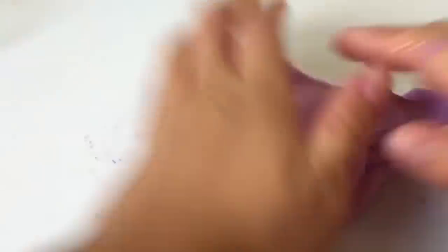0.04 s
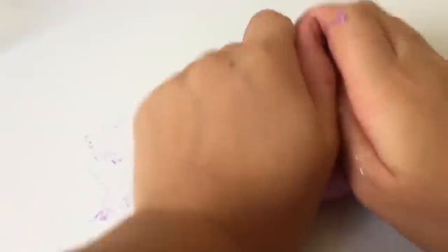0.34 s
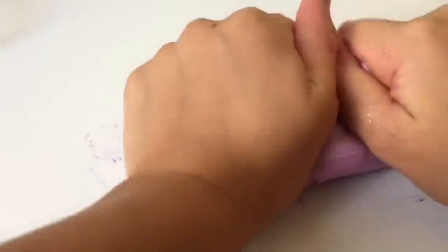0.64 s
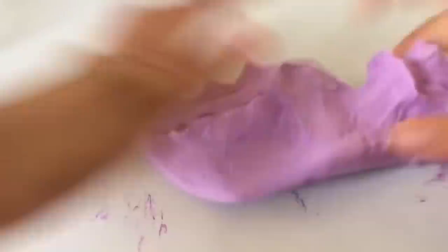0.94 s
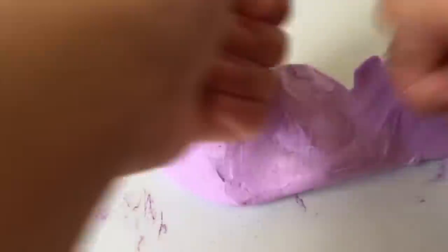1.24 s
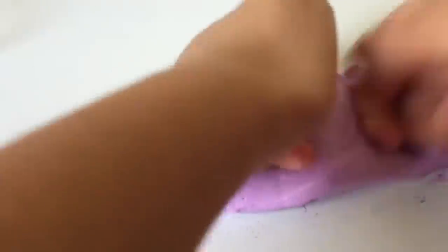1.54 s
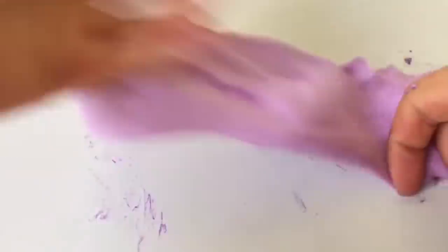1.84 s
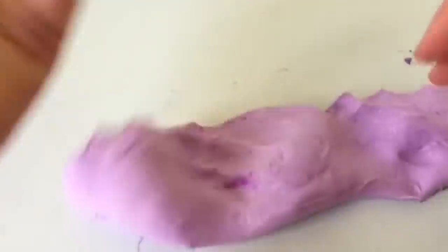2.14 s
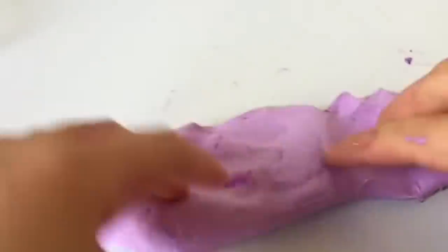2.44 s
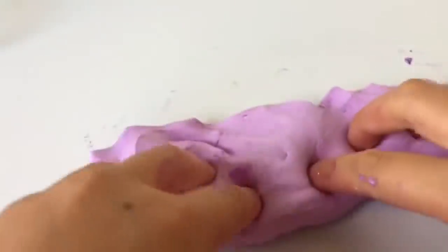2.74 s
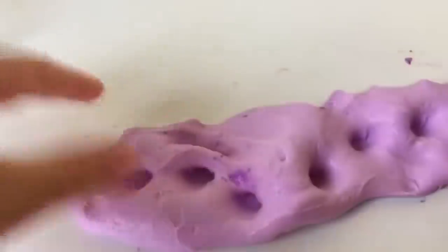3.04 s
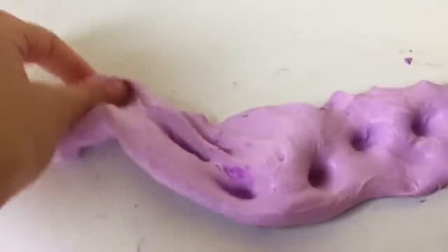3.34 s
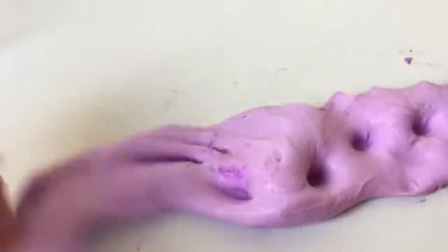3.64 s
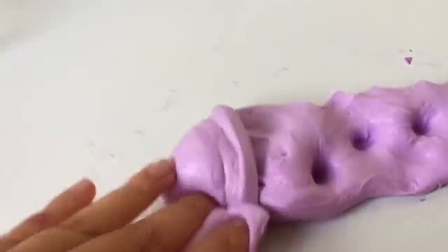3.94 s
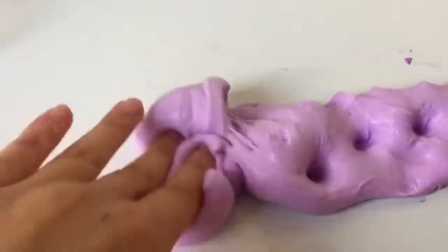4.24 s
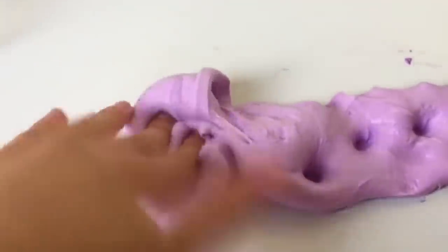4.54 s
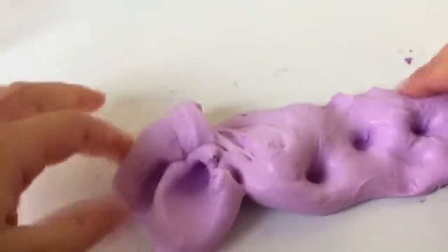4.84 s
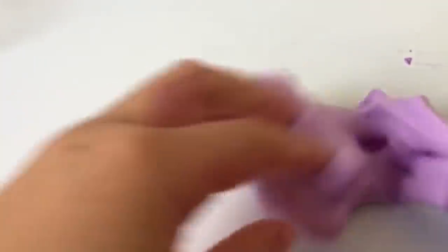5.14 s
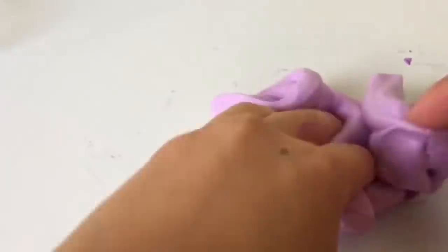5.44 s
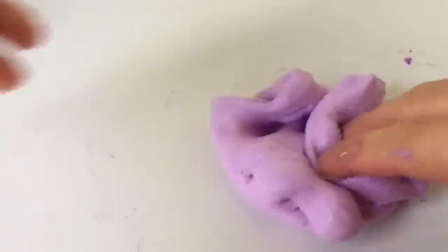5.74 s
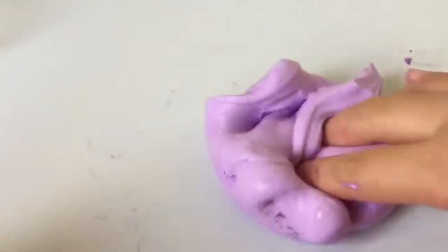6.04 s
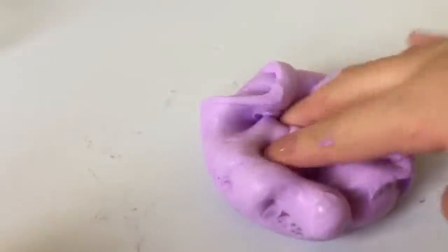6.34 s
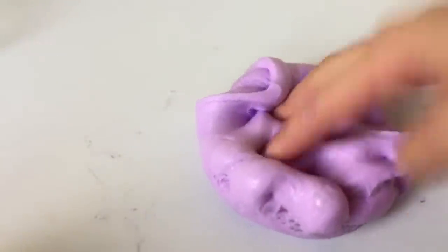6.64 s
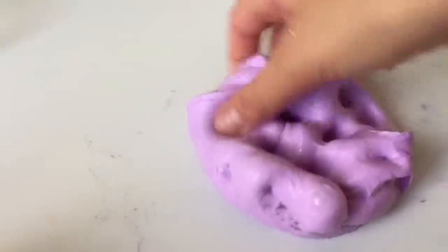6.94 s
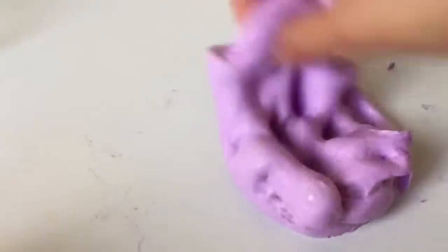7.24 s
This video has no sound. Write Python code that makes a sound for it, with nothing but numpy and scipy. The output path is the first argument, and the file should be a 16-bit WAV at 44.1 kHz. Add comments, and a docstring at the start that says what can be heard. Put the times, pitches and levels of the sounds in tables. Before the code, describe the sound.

Hands knead sticky slime on a table, heard close in a small room with slight reverberation and a quiet rumble and hiss. A soft thud and a wet crackle open the sound, followed by light crackling and a few sharp clicks. At about 1 second a dull bump comes with a squelch and a cluster of pops. More thuds, squelches and small pops follow between 1.7 and 2.4 seconds. Just after 3 seconds several air pockets burst in quick succession over a knock from the tabletop. Only faint sticky crackles and the odd tick are heard from 3.5 to 4.6 seconds. Pops and soft bumps return around 4.7 to 5 seconds and again at 5.8. The loudest, rounder pops come in two clusters at 6.3 and 6.8 seconds, each with a thud. A smaller bump and a faint squelch follow by 7.3 seconds.

```python
"""A soft thud and a wet crackle come first: hands knead sticky slime on a table in a small room.
Each push excites the damped modes of the tabletop. Skin peeling off the slime breaks countless tiny
threads and opens small bubbles, heard as crackle and squelch. Trapped air pockets burst with the snap
of their film and a short cavity resonance. The walls add a brief reverberation to the slime's sounds,
and a quiet rumble and hiss lie underneath."""
import sys
import numpy as np
from scipy import signal
from scipy.fft import rfft, irfft, next_fast_len
from scipy.io import wavfile

SR = 44100
rng = np.random.default_rng(int(sys.argv[2]) if len(sys.argv) > 2 else 0)


def to_wav(s):
    """Save 16-bit WAV."""
    ch = np.atleast_2d(s).T  # columns
    pcm = np.round(np.clip(ch, -1, 1) * 32767)  # PCM
    wavfile.write(sys.argv[1], SR, pcm.astype(np.int16))


N = 325458
TIME = np.arange(N) / SR

# Spectral shape of the room's background noise: frequency_hz, gain_db
BACKGROUND_SPECTRUM = [(25, -16.5), (45, -5.5), (65, 0), (110, -6.5), (155, -4.5), (205, 1.5), (245, -10.5),
                       (310, -10.5), (480, -17.5), (1000, -22), (2200, -23.5), (5000, -28.5),
                       (10000, -32.5), (14000, -34.5)]
# Spectral shape of the wall reflections: frequency_hz, gain_db
REVERB_SPECTRUM = [(100, 1.5), (400, 4.5), (1000, -2.5), (3000, -5), (6000, -6.5), (10000, -6), (14000, -7)]
# Normal modes of the tabletop: pitch_hz, relative_level_db, t60_s
TABLETOP_MODES = [(62, -2, .34), (69, -0.5, .3), (87, -1, .26), (104, -2, 0.37), (122, -1.5, .24),
                  (168.4, -1.5, .26), (210, -1.5, 0.21), (254, 1, .22), (297, -1.5, 0.41), (355, -1.5, .18),
                  (420, -2.5, .15)]
# Pushes on the table (low modes boom, higher modes knock): start_s, boom_db, knock_over_boom_db
PUSHES = [(.005, -41.5, -6), (0.239, -45.5, -14), (.39, -54, -2), (.49, -47.5, -6), (.58, -46.5, -4),
          (.835, -42, -9.5), (1.039, -33.5, -3.5), (1.478, -56, -17), (1.735, -33.5, -14.5),
          (1.935, -37.5, -7.5), (2.262, -37, -12), (2.351, -43, -9), (2.597, -54.5, -8), (3.055, -33, -1.5),
          (3.14, -39, -7.5), (3.28, -39.5, -3.5), (4.156, -60, -8), (4.735, -36.5, -10), (4.87, -45, -17),
          (4.968, -36.5, -5), (5.275, -50.5, -6), (5.775, -41, 7.5), (5.84, -46.5, -4), (6.172, -52.5, 4.5),
          (6.302, -36, -2.5), (6.828, -31.5, -3.5), (7.026, -34.5, 1), (7.265, -48.5, -8.5)]
# Spectral shape of the breaking threads: frequency_hz, gain_db
CRACKLE_SPECTRUM = [(200, -6), (330, -3), (500, -3.5), (1000, -5), (2400, 1.5), (4300, -0.5), (6000, -3),
                    (9000, -4), (11000, -6), (13500, -2.5)]
# Pulls on the slime: full_pull_s, rise_s (last 20 dB), hold_s, relative_level_db, wetness_db
# Greater wetness favours the bubbles over the crackle.
PULLS = [(.009, .026, .011, -35, -4), (.045, .021, 0, -41, -2), (.335, .045, .1, -56, -4),
         (.49, .08, .13, -53, -3.5), (.71, .05, .08, -63, -3), (.852, .075, .02, -45, -10),
         (1.036, .056, .018, -37, 4.5), (1.086, .04, .052, -44, 2), (1.164, .018, 0, -50, 1),
         (1.701, .016, 0, -45, -4), (1.746, .021, .014, -39, .5), (1.81, .06, .07, -60, -1),
         (1.964, .03, 0, -33.5, 4), (2.0, .03, .02, -53, -1), (2.105, .045, .025, -47.5, -3),
         (2.248, .015, 0, -50, 7), (3.09, .028, 0, -39, 2), (3.327, .038, 0, -47, -1.5),
         (3.452, .065, 0, -50.5, -4), (3.642, .012, .033, -59, 2), (3.781, .018, 0, -51.5, 2.5),
         (3.81, .06, .15, -64.5, 3), (4.053, .014, 0, -50, -5), (4.747, .024, .033, -41.5, 0),
         (4.996, .035, .01, -52, 3.5), (5.06, .045, .135, -57, 1), (5.284, .018, .054, -53, 0),
         (5.776, .022, .022, -39.5, 5), (6.334, .022, 0, -38, 3), (7.135, .032, 0, -53, -3),
         (7.236, .02, .034, -51.5, 3.5)]
# Bursting air pockets: start_s, cavity_pitch_hz, relative_level_db, tautness_db
# Greater tautness favours the film's snap over the cavity's ring.
AIR_POCKETS = [(.308, 980, -46, 5), (0.4628, 1530, -50.5, 10), (.5749, 1690, -36, -8.5),
               (0.5895, 970, -31, 5.5), (.6409, 1680, -46.5, -2), (0.7847, 1530, -32.5, 7),
               (.8384, 1370, -28, 12.5), (1.0333, 2310, -28.5, -5), (1.0475, 1570, -24, -9.5),
               (1.053, 800, -30, -19), (1.2304, 916, -71, 12), (1.536, 997, -60.5, -2.5),
               (1.731, 1300, -40, 1), (1.932, 1320, -49, 1), (2.052, 1400, -43, -9.5),
               (2.261, 1402, -35.5, -7.5), (2.3491, 1550, -40, -7), (2.361, 913, -32.5, -17.5),
               (2.836, 1100, -76.5, 12), (3.0463, 1060, -39.5, 3), (3.0554, 780, -27, -1),
               (3.0746, 1344, -24, -3.5), (3.0862, 1200, -28, -8), (3.0972, 1300, -24, -1.5),
               (3.2799, 615, -39, -3.5), (3.355, 1570, -43, 0.5), (4.35, 1506, -47, -1),
               (4.736, 1295, -28.5, 1), (4.8751, 1260, -45, -8), (4.968, 1250, -39.5, -2.5),
               (5.4937, 1172, -78.5, 13.5), (5.7461, 1293, -30, -5.5), (5.7745, 601, -29.5, -10.5),
               (5.791, 731, -31.5, -4), (5.9995, 599.4, -77.5, 10.5), (6.1706, 964.4, -49.5, -1.5),
               (6.3031, 792, -14.5, -5.5), (6.3234, 1020, -20.5, 3.5), (6.3421, 1260, -26, -3.5),
               (6.8282, 787, -15, -1), (6.8416, 950, -21.5, -6), (6.875, 1383, -18.5, -1),
               (7.0282, 658, -35.5, -4.5), (7.076, 542, -42, -11.5)]


def undb(db):
    """Amplitude grows tenfold for every 20 dB."""
    return 10 ** (np.asarray(db) / 20)


def add(track, start_s, sound):
    """Superposition: a sound adds to the track from start_s on."""
    start = int(round(start_s * SR))
    lo, hi = max(start, 0), min(start + len(sound), N)
    track[lo:hi] += sound[lo - start:hi - start]


def at_level(x, db, span_s):
    """Equal energy: x is scaled to match a level of db held for span_s."""
    return x * undb(db) * np.sqrt(span_s * SR / (np.sum(x ** 2) + 1e-18))


def band(x, lo_hz, hi_hz, order=2):
    """A causal band-pass attenuates frequencies outside its edges."""
    sos = signal.butter(order, [lo_hz, min(hi_hz, .45 * SR)], "band", fs=SR, output="sos")
    return signal.sosfilt(sos, x)


def colour(x, spectrum):
    """Spectral weighting: gains are interpolated over log frequency."""
    hz, db = np.transpose(spectrum)
    size = next_fast_len(len(x))
    bin_hz = np.maximum(np.arange(size // 2 + 1) * SR / size, 1)
    gain = undb(np.interp(np.log(bin_hz), np.log(hz), db))
    return irfft(rfft(x, size) * gain, size)[:len(x)]


def decay(t, t60_s):
    """Exponential damping: the level falls 60 dB in t60_s."""
    return np.exp(-np.log(1000) * t / t60_s)


def wander(per_s):
    """Random modulation: straight lines join random values, with a spread near 1."""
    return np.interp(TIME * per_s, np.arange(4096), rng.standard_normal(4096)) * np.sqrt(1.5)


def ruptures(per_s, spread_db=3):
    """Shot noise: independent impulses of either sign, many small and a few large."""
    chance, strength, sign = rng.random(N), rng.exponential(size=N), rng.choice([-1, 1], N)
    return (chance < per_s / SR) * sign * undb(spread_db * np.minimum(strength, 4))


def background(level_db=-63):
    """Stationary noise, weighted toward the bass, gives the room's rumble and hiss."""
    return at_level(colour(rng.standard_normal(N), BACKGROUND_SPECTRUM), level_db, N / SR)


def reverberate(x, wet_db=-18, low_t60_s=.31, high_t60_s=.24, build_s=.009):
    """Reverberation: wall reflections build into a diffuse tail whose treble dies first."""
    t = TIME[:SR * 3 // 5]
    lows = band(rng.standard_normal(len(t)), 90, 4200) * decay(t, low_t60_s)
    highs = band(rng.standard_normal(len(t)), 4200, 16000) * decay(t, high_t60_s)
    tail = colour(lows + highs, REVERB_SPECTRUM) * (1 - np.exp(-(t / build_s) ** 2))
    tail /= np.sqrt(np.sum(tail ** 2))
    return x + undb(wet_db) * signal.fftconvolve(x, tail)[:N]


def faint_ticks(level_db=-81):
    """Sparse shot noise: each impulse sets off a faint high tick."""
    t = TIME[:SR // 25]
    envelope = decay(t, .045) * (1 - decay(t, .012))
    tick = band(rng.standard_normal(len(t)) * envelope, 10800, 14000)
    return at_level(signal.fftconvolve(ruptures(per_s=20), tick)[:N], level_db, N / SR)


def table_thuds(boom_rise_s=.009, knock_rise_s=.0014, settle_s=.058, settle_db=-9):
    """Modal vibration: a push rings the table, and the place of contact sets each mode's share."""
    out, t = np.zeros(N), TIME[:SR // 2]
    hz, mode_db, t60_s = np.transpose(TABLETOP_MODES)[:, :, None]
    low = hz[:, 0] < 150
    boom_onset = 1 - np.exp(-(t / boom_rise_s) ** 2)
    knock_onset = 1 - np.exp(-(t / knock_rise_s) ** 2)
    for push_s, boom_db, knock_over_boom_db in PUSHES:
        # after each push the lump sinks back with a softer bump
        for start_s, db in (push_s, boom_db), (push_s + settle_s, boom_db + settle_db):
            detune, share, phase = rng.standard_normal((3, len(hz), 1))
            tones = np.sin(2 * np.pi * (hz * (1 + .035 * detune) * t + phase))
            modes = undb(mode_db + 3 * share) * tones * decay(t, t60_s)
            add(out, start_s, at_level(modes[low].sum(0) * boom_onset, db, .032))
            add(out, start_s, at_level(modes[~low].sum(0) * knock_onset, db + knock_over_boom_db, .018))
    return out


def snapping_threads(flicker_db=4, flicker_per_s=45):
    """Band-limited shot noise: threads of each thickness snap in their own band, in shifting shares."""
    out = np.zeros(N)
    for hz in np.geomspace(350, 13500, num=16):
        width_hz = hz / 4
        breaks = ruptures(per_s=200 + width_hz)  # wider bands hold more breaks
        clicks = band(breaks, hz - width_hz / 2, hz + width_hz / 2, order=1)
        flicker = undb(flicker_db * wander(flicker_per_s))
        out += np.sqrt(width_hz) * clicks / np.std(clicks) * flicker
    return at_level(colour(out, CRACKLE_SPECTRUM), 0, N / SR)


def bubbles(size, centre_hz, per_s, spread_octaves, ring_cycles=21, spread_db=2.5):
    """Cavity resonance: tiny bubbles open and ring briefly at pitches scattered around centre_hz."""
    out, t = np.zeros(size + SR // 50), TIME[:SR // 50]
    for place, pitch, strength in rng.random((int(per_s * size / SR) + 1, 3)):
        deviation = np.clip(np.log(pitch / (1 - pitch)) / 2, -2, 2)  # bell-shaped scatter
        hz = centre_hz * 2 ** (spread_octaves * deviation)
        gain = undb(spread_db * min(-np.log(strength), 3)) * np.sqrt(hz / centre_hz)
        opening = 1 - np.exp(-2 * hz * t)
        ring = np.sin(2 * np.pi * hz * t) * decay(t, ring_cycles / hz) * opening
        start = int(place * size)
        out[start:start + len(t)] += gain * ring
    return out[:size]


def peeling(first_bubble_hz=1682, sink_octaves_per_s=.115, sag_db_per_s=14.5, jerk_db=2.5):
    """Adhesion fails in jerks: each pull breaks sticky threads while small bubbles open."""
    out, crackle = np.zeros(N), snapping_threads()
    jerks = undb(jerk_db * wander(per_s=110))
    for full_s, rise_s, hold_s, db, wetness_db in PULLS:
        # a pull tires while it is held and lets go more slowly than it grips
        fall_s = 1.3 * rise_s
        span = slice(max(int((full_s - 2 * rise_s) * SR), 0), int((full_s + hold_s + 2 * fall_s) * SR))
        t = TIME[span] - full_s
        slack = np.maximum(np.maximum(-t / rise_s, (t - hold_s) / fall_s), 0)
        pull = undb(-20 * slack ** 1.35 - sag_db_per_s * np.maximum(t, 0))
        effective_s = np.sum(pull ** 2) / SR
        # folding traps ever larger bubbles, which ring lower
        hz = first_bubble_hz * 2 ** (-sink_octaves_per_s * full_s)
        # a harder squeeze opens more bubbles, over a wider range of sizes
        force = np.clip((db + wetness_db + 59.5) / 25, 0, 1)
        squelch = bubbles(len(t), hz, per_s=450 + 1450 * force, spread_octaves=.36 + .38 * force)
        out[span] += at_level(crackle[span] * jerks[span] * pull, db + .2, effective_s)
        out[span] += at_level(squelch * jerks[span] * pull, db + wetness_db - 1.2, effective_s)
    return out


def tear(t, lo_hz, hi_hz, scatter, t60_s):
    """Scattering: one sharp break, heard in one band, rebounds off the film's edges and the hands."""
    impulse = scatter * rng.standard_normal(len(t)) * decay(t, t60_s)
    impulse[0] += 1
    return band(impulse, lo_hz, hi_hz)


def bursting_pockets(cavity_cycles=16, overtone_ratio=1.63, film_cycles=26, burst_s=.005):
    """Impulse excitation: the film snaps and rings, air puffs out and the opened cavity resonates."""
    out, t = np.zeros(N), TIME[:SR // 12]
    for start_s, hz, db, tautness_db in AIR_POCKETS:
        tones = np.sin(2 * np.pi * hz * t) + undb(-7) * np.sin(2 * np.pi * hz * overtone_ratio * t)
        opening = 1 - np.exp(-2 * hz * t)  # the mouth of the pocket widens within the first cycle
        cavity = at_level(tones * opening * decay(t, cavity_cycles / hz), 0, burst_s)
        smack = at_level(tear(t, 600, 2200, scatter=.1, t60_s=.025), -3, burst_s)
        puff = at_level(tear(t, 170, 420, scatter=.1, t60_s=.04), -19, burst_s)
        body = at_level(cavity + smack + puff, .6, .0055)
        # a tauter film snaps higher and throws a louder spray of fine ticks
        snap_hz = 3820 * 2 ** (.04 * tautness_db)
        crack = tear(t, snap_hz / 1.92, snap_hz * 1.92, scatter=.074, t60_s=.026)
        film = np.sin(2 * np.pi * snap_hz * t) * decay(t, film_cycles / snap_hz)
        snap = at_level(crack, 0, burst_s) + at_level(film, -9, burst_s)
        snap = at_level(snap, tautness_db + 2.06, .0041)
        spray = tear(t, 6300, 14000, scatter=.14, t60_s=.016)
        spray = at_level(spray, 1.63 * tautness_db - 7, burst_s)
        add(out, start_s, undb(db) * (body + snap + spray))
    return out


def scene():
    """Superposition: the reverberant slime, the table and the background sum in one channel."""
    air = background()
    slime = bursting_pockets() + peeling() + faint_ticks()
    return (air + reverberate(slime) + table_thuds())[None]


def record(dry, low_cut_hz=48, clip_level=.85, top_hz=14050):
    """Limited bandwidth and range: a phone thins the deep bass, clips high peaks and cuts the top."""
    high_pass = signal.butter(4, low_cut_hz, "high", fs=SR, output="sos")
    low_pass = signal.ellip(10, .2, 70, top_hz, fs=SR, output="sos")
    clipped = np.clip(signal.sosfilt(high_pass, dry), -clip_level, clip_level)
    return signal.sosfilt(low_pass, clipped)


dry = scene()
out = record(dry)
to_wav(out)
```